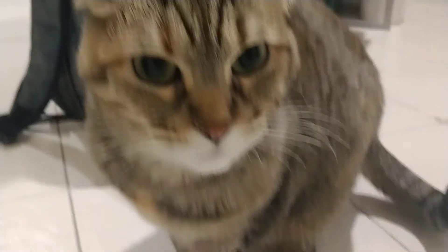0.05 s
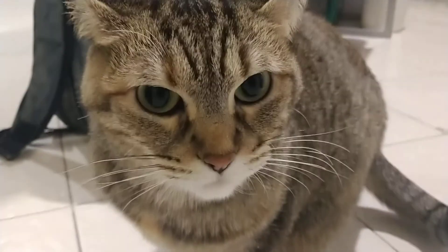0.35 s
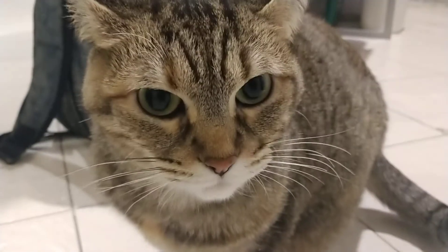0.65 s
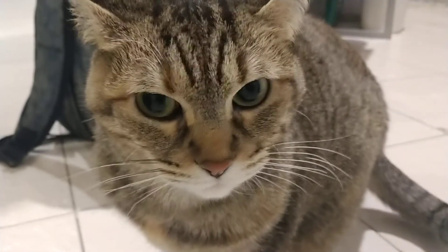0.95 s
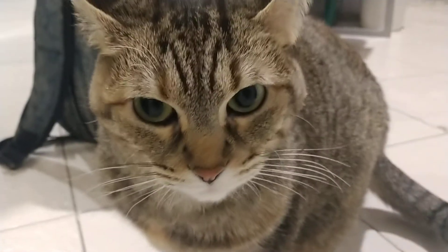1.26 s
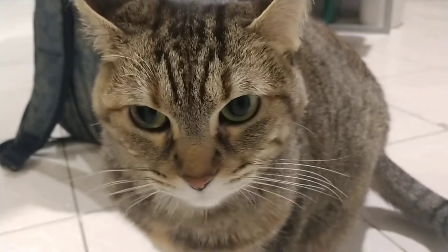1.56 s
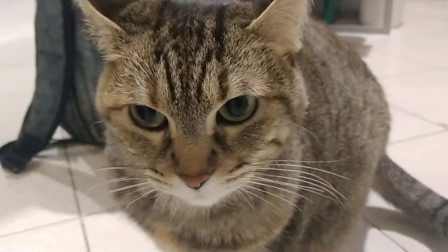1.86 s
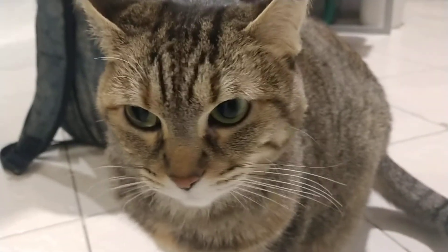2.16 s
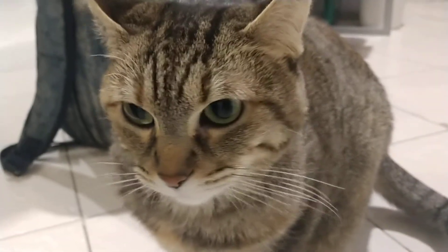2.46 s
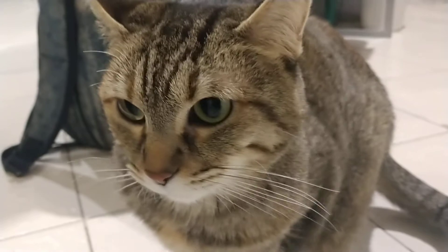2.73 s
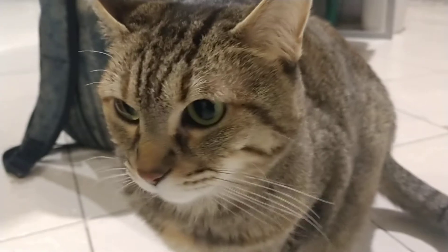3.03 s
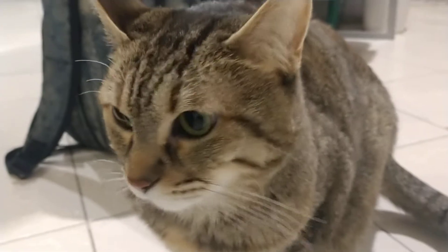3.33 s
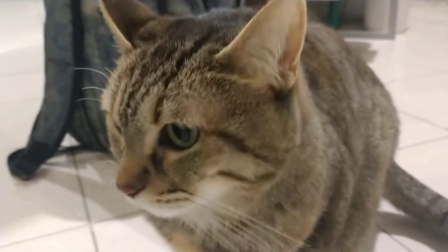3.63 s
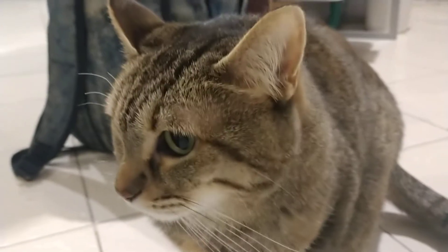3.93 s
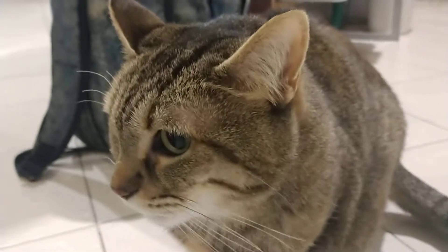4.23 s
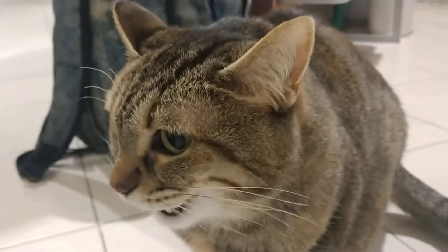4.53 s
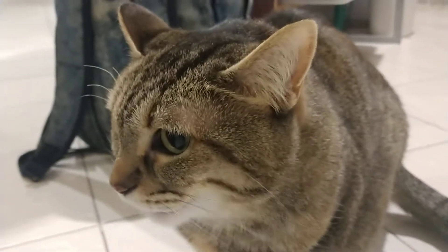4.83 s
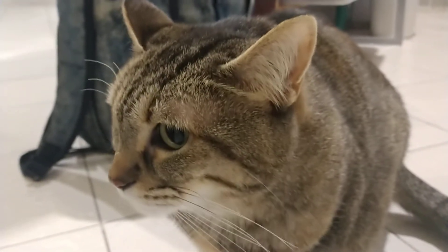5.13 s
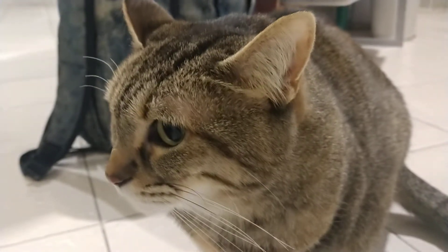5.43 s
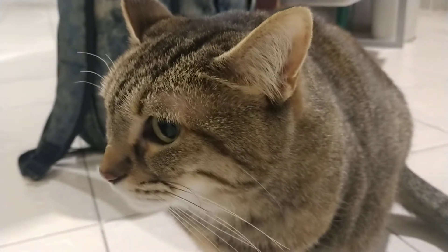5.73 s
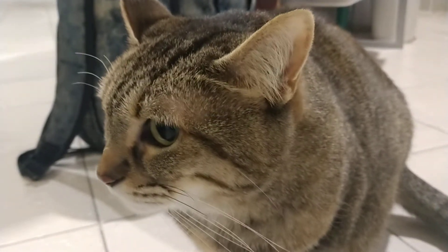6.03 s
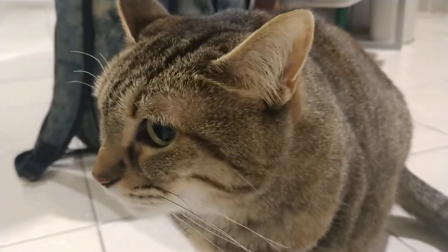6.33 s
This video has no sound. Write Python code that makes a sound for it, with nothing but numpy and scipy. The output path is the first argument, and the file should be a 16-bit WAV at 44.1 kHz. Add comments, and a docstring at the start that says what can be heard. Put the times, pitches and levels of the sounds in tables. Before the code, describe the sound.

Close by indoors, a cat's brief low growl fades; later a breathy snarl runs straight into a second growl.

```python
"""Wary cat on a tiled floor

A low closed-mouth growl dies away close by; after a pause the cat draws a raspy snarl through parted
lips and growls again. Slow throat pulses ring its chest, nose and mouth, and breath sizzles at its
teeth. Around it are three small mouth clicks, a humming indoor rumble and two faint wisps of fizz.
A phone's two microphone ports hear the cat and the room out of step."""
import sys
import numpy as np
from scipy import signal
from scipy.fft import rfft, irfft, next_fast_len
from scipy.io import wavfile

SR = 44100
rng = np.random.default_rng(int(sys.argv[2]) if len(sys.argv) > 2 else 0)


def transcribe(signal):
    """Save signal, clipped to [-1, 1], as a 16-bit WAV file at the path in sys.argv[1]."""
    frames = np.atleast_2d(signal).T
    limited = np.clip(frames, -1, 1)
    pcm = np.round(limited * 32767).astype(np.int16)
    wavfile.write(sys.argv[1], SR, pcm)


N = 285768
TIME = np.arange(N) / SR
SIZE = next_fast_len(N + SR // 2)
FREQ = np.maximum(np.arange(SIZE // 2 + 1) * SR / SIZE, 1)

# body resonances under both growl and snarl: (centre [Hz], width [Hz], level [dB])
CHEST_MODES = [(123.2, 48.4, -58), (178, 38, -63.5), (263, 94, -74)]
THROAT_MODES = [(311, 40, -65), (354, 30, -63.5), (422, 36, -74.5)]


def undb(db):
    """Decibels to gain."""
    return 10 ** (np.asarray(db) / 20)


def ramp(start, length):
    """0 before the start, rising evenly to 1 over the length."""
    return np.clip((TIME - start) / length, 0, 1)


def envelope(start, end, attack_s, release_s):
    """Attack, hold at 1, release."""
    return ramp(start, attack_s) * (1 - ramp(end - release_s, release_s))


def curves(rows):
    """One automation curve for each value column of a timed table."""
    times, *columns = np.transpose(rows)
    return [np.interp(TIME, times, column) for column in columns]


def across(points):
    """(Hz, value) points joined on a log-frequency axis."""
    hz, value = np.transpose(points)
    return np.interp(np.log(FREQ), np.log(hz), value)


def noise():
    """White noise of unit power per Hz."""
    return rng.standard_normal(N) * np.sqrt(SR / 2)


def shape(x, response):
    """Filter by a frequency response."""
    return irfft(rfft(x, SIZE) * response, SIZE)[..., :N]


def resonances(modes):
    """Causal response of a set of steep-sided resonances."""
    power = sum(undb(db) ** 2 / (1 + ((FREQ / hz - hz / FREQ) * hz / width) ** 2) ** 2
                for hz, width, db in modes)
    # minimum phase, so the ring follows the hit
    cepstrum = irfft(np.log(power + 1e-16) / 2, SIZE)
    cepstrum[1:SIZE // 2] *= 2
    cepstrum[SIZE // 2 + 1:] = 0
    return np.exp(rfft(cepstrum))


def gliding(x, hz, width_hz):
    """A steep resonance whose centre can move: shift down to zero, smooth twice, shift back."""
    carrier = np.exp(2j * np.pi * np.cumsum(hz) / SR)
    pole = np.exp(-np.pi * width_hz / SR)
    smoothed = signal.lfilter([(1 - pole) ** 2], np.poly([pole, pole]), x / carrier)
    return 2 * np.real(carrier * smoothed)


def ports(x, scattered, balance, lead, likeness):
    """Stereo image: a shared part, out of step between the ports, and a scattered part in opposition."""
    alike = np.clip(across(likeness), 0, 1)
    shared = rfft(x, SIZE) * np.sqrt((1 + alike) / 2)
    apart = rfft(scattered, SIZE) * np.sqrt((1 - alike) / 2)
    ratio = undb(across(balance))
    left = (shared + apart) * ratio
    right = (shared - apart) * np.exp(-1j * lead)
    return irfft(np.array([left, right]) * np.sqrt(2 / (1 + ratio ** 2)), SIZE)[:, :N]


def room_tone():
    """A slowly swelling rumble with humming bands, under a steady hiss with faint drones."""
    # noise beds: (frequency [Hz], level [dB])
    rumble = [(15, -100), (35, -85.5), (52, -76.5), (80, -70), (140, -69), (200, -75), (280, -82),
              (380, -85), (460, -98), (800, -106), (2000, -125)]
    hiss = [(100, -100), (500, -95.5), (800, -95.5), (1100, -99.5), (1600, -102.5), (2400, -105),
            (3300, -105), (4100, -107.5), (5000, -106.5), (6000, -108), (10000, -108), (15500, -108)]
    # narrow bands in the beds: (centre [Hz], width [Hz], level [dB])
    hum = [(97.7, 3.34, -58), (124.75, 6.9, -60.5)]
    drones = [(38.7, 7, -66), (238.6, 13.7, -65), (664, 41, -87.5)]
    # fader ride on rumble and hum: (time [s], gain [dB])
    swell = [(0, 4), (2.6, 0.5), (3.5, 4.5), (3.8, 6.5), (4.05, 3), (4.5, 6.5), (6.48, 5)]
    # pan of the room: (frequency [Hz], left minus right [dB])
    balance = [(40, 17), (110, 5), (220, 6), (380, 3.5), (700, 2.5), (1300, 0), (2400, 0.5), (4400, 0.5),
               (8000, 0.5), (15000, -3.5)]
    # phase between the ports, on top of the delay: (frequency [Hz], left lead [rad])
    phase = [(45, -2.4), (105, -1.7), (165, -.95), (220, -2.4), (370, -1.4), (1100, -3), (1400, -3.8),
             (1800, -2.3), (2400, -3.2), (3000, -2.8)]
    # how alike the ports hear the room: (frequency [Hz], likeness [0-1])
    likeness = [(40, .85), (110, .9), (170, .75), (225, .4), (350, .8), (500, .35), (750, .8), (1150, .95),
                (1580, .2), (2150, .85), (2700, .3), (3300, .8), (6000, .55), (15000, .5)]
    right_delay_s = .00042
    swell_db, = curves(swell)
    low = np.hypot(undb(across(rumble)), np.abs(resonances(hum)))
    high = np.hypot(undb(across(hiss)), np.abs(resonances(drones)))
    shared, scattered = (shape(noise() * undb(swell_db), low) + shape(noise(), high) for _ in range(2))
    lead = across(phase) + 2 * np.pi * FREQ * right_delay_s
    return ports(shared, scattered, balance, lead, likeness)


def fizz():
    """Brief, faint wisps of very high noise, mostly on the right."""
    # wisps: (start [s], length [s], level [dB])
    wisps = [(2.035, .18, -105), (6.025, .2, -103)]
    gate = sum(envelope(start, start + length, attack_s=.015, release_s=.015) * undb(db)
               for start, length, db in wisps)
    pan = undb([[-5], [5]])
    return gliding(noise() * gate, hz=13950, width_hz=1300) * pan


def tiles(x, t60):
    """Dense reflections from the floor and walls, as strong as the sound that feeds them."""
    tail = rng.standard_normal(N) * undb(-60 * TIME / t60) * (TIME > .003)
    return shape(x, rfft(tail / np.linalg.norm(tail), SIZE))


def close_by(x, room_db, t60):
    """Places a sound where the cat sits, with a little of the room behind it."""
    # pan of the cat: (frequency [Hz], left minus right [dB])
    balance = [(110, 5), (220, 10), (380, 3), (700, 2.5), (1250, -1.5), (1530, -8), (1850, 1), (2400, -1),
               (2720, -10), (3050, 1), (4600, 3), (5850, -3), (6800, .5)]
    # phase between the ports: (frequency [Hz], left lead [rad])
    phase = [(45, -2.3), (165, -.4), (230, -1.7), (370, -.3), (600, -.7), (1100, -.05), (1370, -.3),
             (1620, -2.6), (1850, -2.8), (2000, -3.7), (2700, -3.7), (2850, -6.6), (3650, -6.2),
             (4050, -9.8), (4800, -9.2), (5100, -6.6), (5400, -7.1), (5800, -6.5), (6200, -3.5),
             (6500, -4.35), (6950, -4.1), (7400, -1.4)]
    # how alike the ports hear the cat: (frequency [Hz], likeness [0-1])
    likeness = [(60, .88), (140, .9), (230, .55), (350, .88), (1100, .96), (1600, .87), (2400, .94),
                (7000, .83)]
    shared = x + undb(room_db) * tiles(x, t60)
    return ports(shared, tiles(x, t60), balance, across(phase), likeness)


def mouth_clicks():
    """Tongue and lips part with a snap and a very short wet crackle."""
    # clicks, from dull tongue tock to bright lip smack: (time [s], level [dB], wetness [0-1])
    clicks = [(0.844, -12, 0.14), (4.278, -10.5, 0.38), (6.35, -11, 0.79)]
    # their resonances: (centre [Hz], width [Hz], level [dB])
    tock_modes = [(1130, 300, -68), (2460, 1300, -87)]
    smack_modes = [(2500, 340, -72.5), (3800, 2700, -78.5), (5100, 560, -96)]
    decay_s = .0018
    dull, bright = np.zeros(N), np.zeros(N)
    for start, db, wet in clicks:
        age = TIME - start
        snap = noise() * (age >= 0) * np.exp(-np.abs(age) / decay_s)
        snap[int(start * SR)] += SR * undb(-19.5)  # hard leading edge
        dull += snap * undb(db) * (1 - wet)
        bright += snap * undb(db) * wet
    return shape(dull, resonances(tock_modes)) + shape(bright, resonances(smack_modes))


def vocal_folds(start, end, hz, weak_size, jitter_s, scatter_db):
    """Uneven pulses of the vocal folds, every second one scaled by weak_size."""
    cycles = np.cumsum(hz * (TIME >= start)) / SR
    count = np.arange(1, int(np.interp(end, TIME, cycles)))
    timing_draw, level_draw = rng.standard_normal((len(count), 2)).T
    due = np.minimum(np.searchsorted(cycles, count), N - 1)
    jitter = (np.broadcast_to(jitter_s, N)[due] * SR * timing_draw).astype(int)
    at = np.clip(due + jitter, 0, N - 1)
    size = np.where(count % 2, 1, np.broadcast_to(weak_size, N)[at]) * undb(scatter_db * level_draw)
    pulses = np.zeros(N)
    pulses[at] = size / np.sqrt(np.mean(size ** 2)) * SR / np.sqrt(2 * hz[at])  # as strong as noise()
    return pulses


def puffs(pulses, puff_s):
    """The puff of air that each pulse lets through."""
    pole = np.exp(-2 / (puff_s * SR))
    power = signal.lfilter([1 - pole], [1, -pole], pulses ** 2 + 1e-18)
    return np.sqrt(power) * rng.standard_normal(N)


def growl(course, chest_db, rattle_db, eases_at_s, climb_hz):
    """Mouth shut: pulses hum in chest and throat; a breathy rasp and crisp rattle leave by the nose."""
    # nasal resonances: (centre [Hz], width [Hz], level [dB])
    nose_modes = [(700, 210, -86), (928, 80, -87), (1089, 217, -85), (1430, 2700, -100), (3900, 360, -105),
                  (7400, 3400, -109)]
    waver_step_s, throat_top_hz = .05, 442
    hz, effort_db, rasp_db, weak_size, rough = curves(course)
    start, end = course[0][0], course[-1][0]
    push = envelope(start, end, attack_s=.0088, release_s=.019)
    knots = np.arange(0, N / SR + waver_step_s, waver_step_s)
    waver_hz = np.interp(TIME, knots, rng.standard_normal(len(knots)))
    pulses = vocal_folds(start, end, hz + waver_hz, weak_size, jitter_s=.0003 * rough, scatter_db=1.2)
    breath, snaps = puffs(pulses, puff_s=.01), puffs(pulses, puff_s=.0018)
    tone = (pulses + undb(-1) * rough * breath) * push * undb(effort_db)
    rasp = (undb(-5.5) * pulses + undb(-.7) * breath) * push * undb(rasp_db)
    rattle = (undb(-5) * pulses + undb(-1.5) * snaps) * push * undb(rasp_db)
    chest = shape(tone * undb(chest_db), resonances(CHEST_MODES))
    # the shut mouth swallows the top of the throat's ring
    throat = shape(tone, resonances(THROAT_MODES) / (1 + (FREQ / throat_top_hz) ** 10))
    nose = shape(rasp, resonances(nose_modes))
    # the upper nasal resonance climbs as the growl sags
    nose_top_hz = 2410 + climb_hz * ramp(eases_at_s, .33)
    nose_top = undb(rattle_db) * gliding(rattle, nose_top_hz, width_hz=560)
    return chest + throat + nose + nose_top


def growls():
    """A low growl that dies away, and a higher one straight out of the snarl."""
    # course of each growl:
    # (time [s], pulse rate [Hz], effort [dB], nasal rasp [dB], weak pulse size [0-1], roughness [0-1])
    low_course = [(-.09, 98.2, -6, -11, 0, 0.2), (.12, 104.2, -3.5, -0.5, 0.26, 0.54),
                  (.3, 102.7, 0, 0, 0.22, 0.46), (.42, 100.6, -3, -1, 0.53, 0.3),
                  (.58, 98.4, -6.5, -5.5, 0.66, 0.5), (.68, 94.6, -7.5, -4, 0.7, 0.9),
                  (.75, 91, -27, -17, 0.7, 0.89)]
    high_course = [(5.05, 110.5, -9, -3.5, 1, 0.24), (5.15, 118.6, -3.5, -2, 0.95, 0.14),
                   (5.27, 126.6, -1.5, 2.5, 0.71, 0.32), (5.35, 122.8, -1, 2.5, 0.45, 0.4),
                   (5.69, 123.8, -1, 2, 0.62, 0.31), (5.86, 117.5, -3.5, -1.5, 0.7, .3),
                   (5.98, 114.8, 4, -3, 0.34, 0.37), (6.08, 105.5, -2.5, -4.5, 0.36, 0.84),
                   (6.3, 103.2, -3.5, -3, 0.32, 0.92), (6.5, 96.5, -18, -6, 0.84, 0.42)]
    low = growl(low_course, chest_db=-2.2, rattle_db=-89.7, eases_at_s=.362, climb_hz=20)
    high = growl(high_course, chest_db=.9, rattle_db=-95.5, eases_at_s=5.715, climb_hz=620)
    return low + high


def snarl():
    """Mouth open: a rush of breath breaks into a rattle, rings the mouth and sizzles at the teeth."""
    # flutter of the throat: (time [s], pulse rate [Hz])
    flutter_rate = [(4.145, 97), (4.39, 97), (4.44, 91), (4.53, 86), (4.69, 91), (4.9, 100), (5.03, 110)]
    # push of air: (time [s], effort [dB])
    effort = [(4.145, -24), (4.19, -15), (4.24, -16.5), (4.3, -8.5), (4.337, -13), (4.355, -5),
              (4.425, 2.5), (4.455, -1), (4.49, 1), (4.565, -2.5), (4.61, 1), (4.66, 1), (4.715, -3),
              (4.82, 1.5), (4.93, 1), (4.975, 0), (5.003, -2.5), (5.03, -20)]
    # sizzle at the teeth, relative to that push: (time [s], gain [dB])
    sizzle_ride = [(4.3, 7.5), (4.42, 5), (4.5, 1.5), (4.68, -.5), (4.8, 2), (4.93, 4.5)]
    # the lips draw back, then relax: (time [s], drawn back [0-1])
    lip_curl = [(4.39, 0), (4.47, 0.35), (4.68, 0.74), (4.84, 0.9), (4.92, 0.2), (4.98, 0.05)]
    # resonances of mouth and teeth: (centre [Hz], width [Hz], level [dB])
    narrow_modes = [(1003, 440, -83.5), (1277, 760, -80), (1700, 400, -84)]
    wide_modes = [(700, 840, -87), (1330, 470, -81.5), (1790, 440, -77), (2100, 160, -84)]
    teeth_modes = [(4800, 350, -104), (5420, 260, -101), (5750, 480, -99), (6450, 750, -100)]
    bared_modes = [(6600, 520, -99)]
    shutting_modes = [(1400, 380, -81.5), (6080, 560, -87.5)]
    catch_s, shut_s, mouth_top_hz = .2, .15, 2950
    hz, = curves(flutter_rate)
    effort_db, = curves(effort)
    sizzle_db, = curves(sizzle_ride)
    lips, = curves(lip_curl)
    start, end = flutter_rate[0][0], flutter_rate[-1][0]
    shut = ramp(end - shut_s, shut_s)
    caught = ramp(start, catch_s) ** 2  # the rush sets the throat rattling
    pulses = vocal_folds(start, end, hz, weak_size=1, jitter_s=.0004, scatter_db=1)
    flutter = undb(-6) * pulses + undb(-1) * puffs(pulses, puff_s=.0027)
    slip = undb(-3) * lips * ramp(start, end - start)
    rush = (np.sqrt(1 - caught) + slip) * noise()
    air = (np.sqrt(caught) * flutter + rush) * undb(effort_db)
    # the mouth brightens as the lips draw back
    narrow = shape(air * (1 - lips), resonances(narrow_modes))
    wide = shape(air * lips, resonances(wide_modes))
    bright = gliding(air * undb(-79 + 2.5 * lips), hz=2400 + 30 * lips, width_hz=480)
    treble_shelf = undb(-9) + (1 - undb(-9)) / (1 + (FREQ / mouth_top_hz) ** 20)
    cavity = shape(narrow + wide + bright, treble_shelf)
    sizzle = air * (1 - shut ** 2) * undb(sizzle_db)
    teeth = shape(sizzle, resonances(teeth_modes))
    bared = shape(sizzle * np.sqrt(lips), resonances(bared_modes))
    # two resonances flare and slide down as the mouth shuts
    flare, fall = air * np.sin(np.pi * shut), 1 - .6 * shut ** 4
    slide = sum(undb(db) * gliding(flare, centre * fall, width) for centre, width, db in shutting_modes)
    body = shape(pulses * undb(effort_db - 13.5), resonances(CHEST_MODES + THROAT_MODES))
    return cavity + teeth + bared + slide + body


def scene():
    """Growls, snarl and clicks up close, over the room tone."""
    growling = close_by(growls(), room_db=-15, t60=.18)
    mouth = close_by(snarl() + mouth_clicks(), room_db=-15, t60=.2)
    return growling + mouth + room_tone() + fizz()


def record(dry):
    """The phone cuts the top end steeply."""
    top_hz, rolloff_hz = 15700, 100
    return shape(dry, np.clip((top_hz - FREQ) / rolloff_hz + 1, 0, 1))


dry = scene()
out = record(dry)
transcribe(out)
```